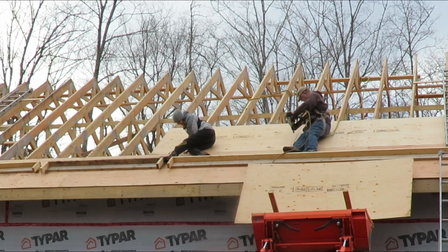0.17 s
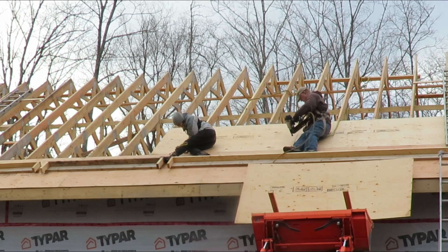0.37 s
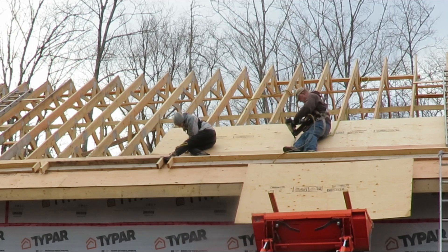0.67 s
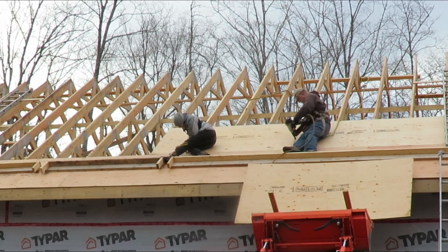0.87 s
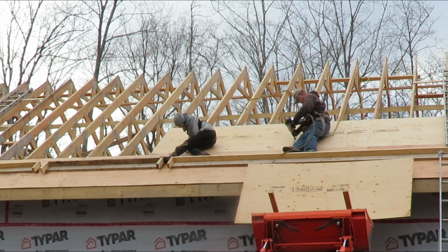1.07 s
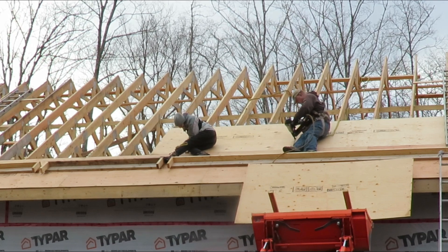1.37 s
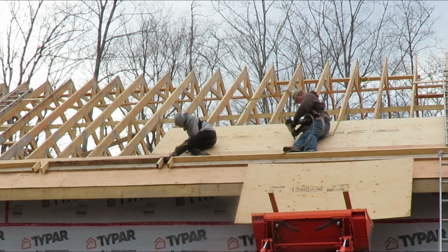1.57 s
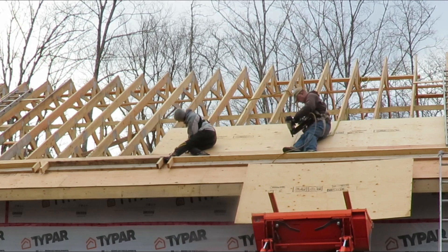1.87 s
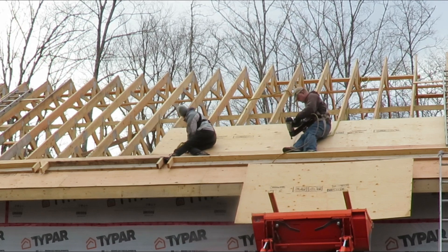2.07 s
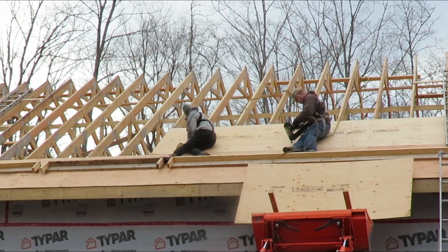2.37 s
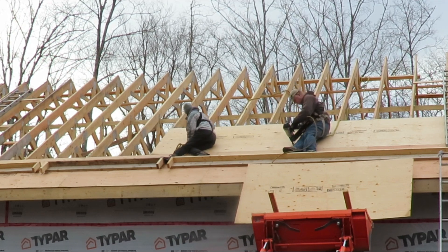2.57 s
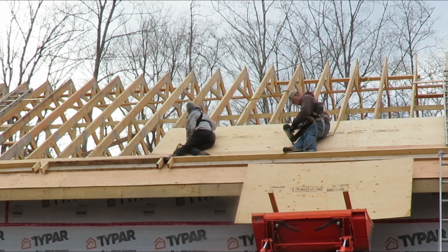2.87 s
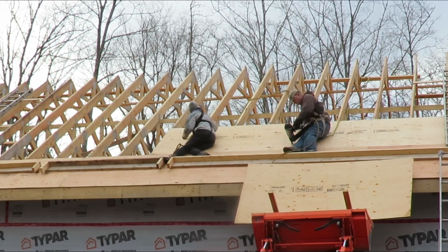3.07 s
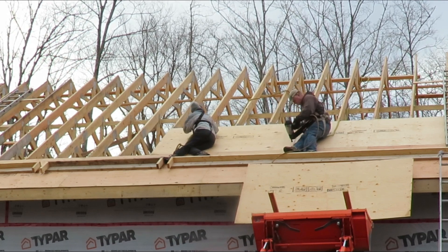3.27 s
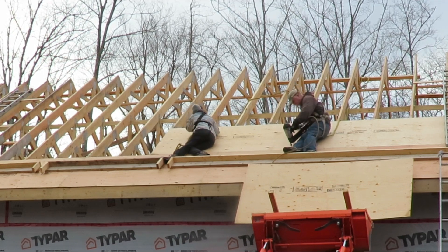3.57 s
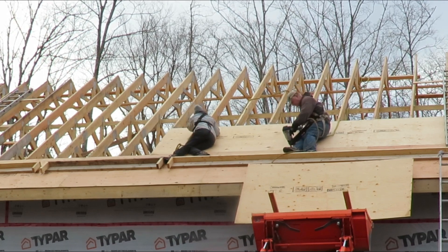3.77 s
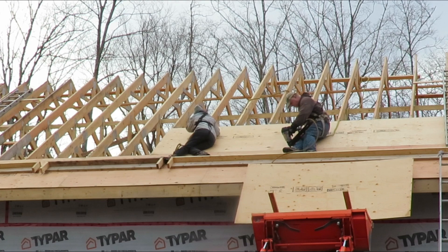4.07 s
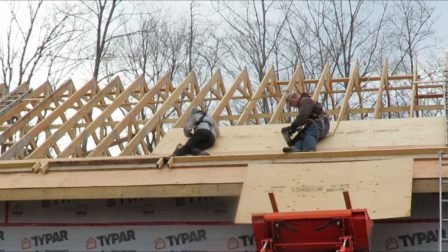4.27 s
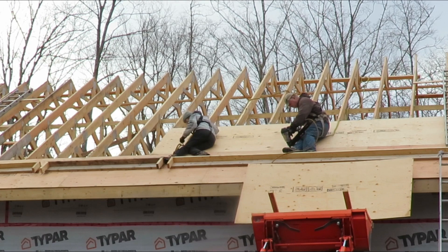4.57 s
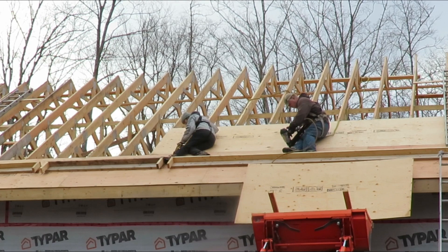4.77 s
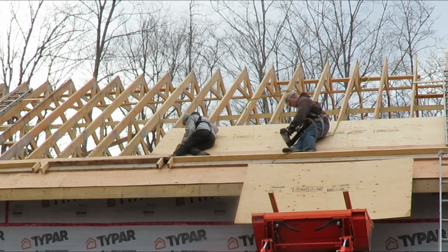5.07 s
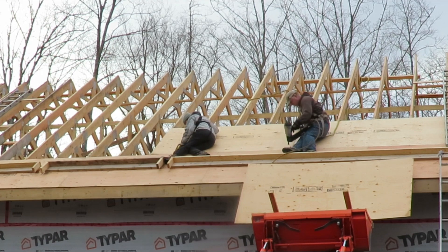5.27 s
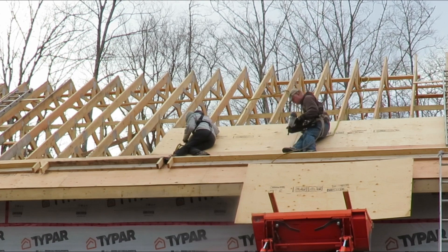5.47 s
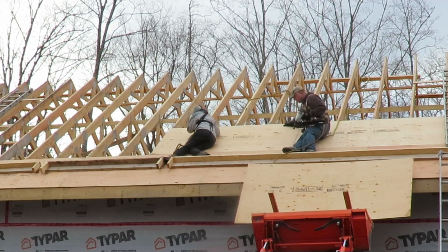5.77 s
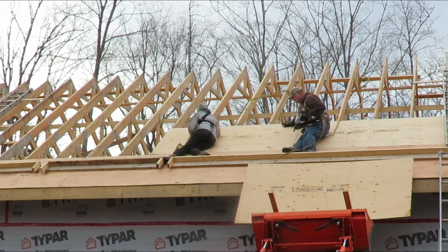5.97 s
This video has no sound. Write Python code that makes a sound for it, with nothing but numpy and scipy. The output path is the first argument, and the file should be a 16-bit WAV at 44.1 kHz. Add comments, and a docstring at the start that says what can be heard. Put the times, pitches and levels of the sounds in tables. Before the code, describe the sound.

Single bangs from an air nailer echo across a quiet building site, separated by small knocks and short drags over wood.

```python
"""Nail gun on a roof

A pneumatic nailer fastens plywood, heard from the ground of an open building site. Each shot is a valve
snap, the nail's thud, the piston's stop, a puff of exhaust and the return clack, echoing off house and
trees. Between shots the gun is pressed onto the sheet and something is dragged over the boards.
A far engine hums. An automatic gain control ducks at each shot and creeps back."""
import sys
import numpy as np
from scipy import signal
from scipy.fft import rfft, irfft, next_fast_len
from scipy.io import wavfile

SR = 44100
rng = np.random.default_rng(int(sys.argv[2]) if len(sys.argv) > 2 else 0)


def wav_out(sig):
    """Save sig, one row per channel (or a flat mono array), as 16-bit PCM at SR to the path in sys.argv[1]."""
    wavfile.write(sys.argv[1], SR, np.round(np.clip(np.atleast_2d(sig).T, -1, 1) * 32767).astype(np.int16))


N = 270333
TIME = np.arange(N) / SR
HIT_TIME = np.arange(SR // 3) / SR   # time within one shot or knock


# trigger pulls: start_s, level_db, stroke_delay_ratio, sheet_pitch_ratio, crack_db, echo_db,
# return_delay_s, return_db
SHOTS = [(-0.030, 3, 0.93, 1.2, 6.5, 5, 0.069, -8), (1.6719, 0.3, 1, 1.006, 0, 7, 0.0702, -4),
         (3.0833, 2.5, 0.97, 1.0, -3, 3, 0.0688, -10.5), (5.1420, 0, 0.95, 1.038, 1, 4, 0.0695, -8)]

def nailing(echoes, diffuse_db=14.5, ringing_db=6, low_cut_hz=160, echo_delay_s=.008):
    """Each shot arrives directly, followed by a smooth echo tail with a few broad resonances in it."""
    out = np.zeros(N)
    low_cut = signal.butter(2, low_cut_hz, "high", fs=SR, output="sos")   # gently rolls off the bass of each shot
    tail = from_db(diffuse_db) * echoes + from_db(ringing_db) * ringing_echoes()
    for start_s, level_db, stretch, pitch, crack_db, echo_db, return_s, return_db in SHOTS:
        shot = exhaust_puff(HIT_TIME) + deck_shudder(HIT_TIME)
        shot += strokes(HIT_TIME, stretch, pitch, crack_db)
        shot += from_db(return_db) * piston_return(HIT_TIME - return_s)
        add(out, from_db(level_db) * signal.sosfilt(low_cut, shot), start_s)
        add(out, from_db(level_db + echo_db) * tail, start_s + echo_delay_s)
    return out


# valve opens, nail enters, then the piston stop strikes three times in quick succession: # delay_s, gun_db,
# plywood_db, crack_db, crack_t60_s
STROKES = [(0.0001, -14, -17.5, -10, 0.033), (0.0078, -19.5, 1.5, -6.5, .012),
           (0.011, -7, -1.5, -3.5, .016), (0.013, 3.5, -15.5, 1.5, 0.065), (0.0160, 3, -13, 7, .036)]

def strokes(t, stretch, sheet_pitch, shot_crack_db):
    """Five quick blows fuse into one bang; each rings gun and sheet and cracks briefly."""
    out = np.zeros(len(t))
    for delay_s, gun_db, plywood_db, crack_db, crack_t60_s in STROKES:
        since = t - delay_s * stretch
        out += from_db(gun_db) * gun_body(since) + from_db(plywood_db) * plywood(since, sheet_pitch)
        out += from_db(shot_crack_db + crack_db) * crack(since, crack_t60_s)
    return out


# modes of the gun body: pitch_hz, level_db, t60_s
GUN_MODES = [(1090, -2.5, .04), (1237, -6, 0.042), (1400, -6, 0.017), (1727, 1.5, 0.026), (1874, -3, 0.05),
             (2091, -4, 0.036), (2355, -7.5, 0.066), (2635, -6.5, 0.054), (3232, -9.5, .025),
             (3660, -9, 0.01), (4500, -10.5, .02), (5730, -6.5, .022)]

def gun_body(t):
    """The struck gun gives a short, bright clank."""
    return ring(GUN_MODES, t)


# modes of the sheet on its rafters: pitch_hz, level_db, t60_s
PLYWOOD_MODES = [(161, -21.5, .06), (228.2, -0.5, 0.023), (316, -1.5, 0.05), (354, -5, 0.058),
                 (524, -6.5, 0.061), (612, -13.5, 0.031), (829, -5, 0.058), (1097, -1.5, 0.017),
                 (1407, -2, .025)]

def plywood(t, pitch_ratio=1):
    """The sheet thuds, its pitch depending on the spot that is hit."""
    return ring(PLYWOOD_MODES, t, pitch_ratio)


# colour of the crack: freq_hz, level_db
CRACK_COLOUR = [(30, -14.5), (120, -11), (300, -5.5), (700, 2.5), (1600, 2.5), (3000, -2), (5500, -5),
                (7200, -13), (11000, -14), (15500, -30.5)]

def crack(t, t60_s):
    """A splintering burst of noise on the front of a blow."""
    return fade(t, t60_s) * noise(CRACK_COLOUR, len(t))


# colour of the exhaust air: freq_hz, level_db
EXHAUST_COLOUR = [(100, -4.5), (300, 7), (900, -1), (2200, 4.5), (4000, -2.5), (6000, 0), (7500, -8.5),
                  (10000, -5), (13000, -11.5), (15500, -28.5)]

def exhaust_puff(t, level_db=-8.5, delay_s=.025, sag_db_per_s=261.5):
    """The port opens, the blast sags as the cylinder empties, then the port shuts."""
    since = t - delay_s
    pressure = from_db(level_db - sag_db_per_s * since)
    port = envelope(since, attack_s=.009, hold_s=.023, release_t60_s=.099)
    return noise(EXHAUST_COLOUR, len(t)) * pressure * port


def piston_return(t, rattle_db=-4, rattle_t60_s=.11):
    """The piston clacks home, ringing the body and rattling the nose."""
    rattle = fade(t, rattle_t60_s) * steel_nose(rng.standard_normal(len(t)))
    return gun_body(t) + from_db(rattle_db) * rattle


# resonances of the nose piece: pitch_hz, width_hz, level_db
NOSE_RESONANCES = [(560, 48, -7), (1010, 610, -10), (1526, 110, 0.5), (1735, 170, 1), (2290, 220, 0),
                   (2840, 570, -10), (3800, 380, -7.5), (5170, 700, -15), (6000, 350, -15),
                   (9000, 3500, -27.5)]

def steel_nose(contact):
    """The nose piece gives contact noise a metallic ring."""
    return resonate(contact, NOSE_RESONANCES)


# colour of the shaking roof deck: freq_hz, level_db
DECK_COLOUR = [(50, -20), (130, -2.5), (300, -3), (700, -2), (1300, -6.5), (3000, -23), (8000, -43.5)]

def deck_shudder(t, level_db=-19, delay_s=.02):
    """The blow spreads through the roof deck, which booms briefly."""
    boom = envelope(t - delay_s, attack_s=.035, hold_s=.035, release_t60_s=.41)
    return from_db(level_db) * noise(DECK_COLOUR, len(t)) * boom


def knock(t60_s, wood_db=-17.5, bright_hz=9000, deck_db=-9, deck_t60_s=.21):
    """A rattling contact rings the nose; wood_db sets how much it thumps the sheet and shakes the deck."""
    t = HIT_TIME
    burst = rng.standard_normal(len(t)) * fade(t, t60_s)
    contact = signal.lfilter(*signal.butter(2, bright_hz, fs=SR), burst)
    deck = from_db(deck_db) * noise(DECK_COLOUR, len(t)) * fade(t, deck_t60_s)
    return steel_nose(contact) + from_db(wood_db) * (plywood(t) / 2 + deck)


# nose pressed onto the sheet: start_s, touch_db, tip_travel_s, seat_db, wood_db
PRESSES = [(1.5438, -22.5, 0.012, -19, -2), (2.9298, -24, 0.0081, -22.5, -4),
           (4.770, -34.5, .027, -27, -9.5)]
# light clicks of gun and nail strip: start_s, level_db, bright_hz
CLICKS = [(0.967, -32, 2278), (1.420, -36.5, 2397), (1.824, -11.5, 14000), (2.670, -27, 9000),
          (2.691, -30.5, 5980), (2.726, -37, 11810), (2.796, -36, 4500), (3.042, -32.5, 6000),
          (3.208, -10.5, 14000)]

def handling():
    """A press is a touch, then a firm knock as the safety tip bottoms out; the gun clicks in the hand."""
    out = np.zeros(N)
    for start_s, touch_db, travel_s, seat_db, wood_db in PRESSES:
        add(out, from_db(touch_db) * knock(t60_s=.022), start_s)
        add(out, from_db(seat_db) * knock(t60_s=.038, wood_db=wood_db), start_s + travel_s)
    for start_s, level_db, bright_hz in CLICKS:
        add(out, from_db(level_db) * knock(t60_s=.044, bright_hz=bright_hz), start_s)
    return out


# drags, each pressing harder until it stops: start_s, length_s, final_db, swell_db_per_s
DRAGS = [(4.128, .345, -26.5, 49), (5.468, 0.239, -27, 21)]
# scuffs where the load catches: start_s, level_db
CATCHES = [(4.160, -32.5), (4.282, -28), (4.334, -19.5), (4.379, -18), (4.426, -29.5), (5.68, -18)]
# resonances of the rubbed boards: pitch_hz, width_hz, level_db
BOARD_RESONANCES = [(304, 200, -11.5), (540, 210, -1), (910, 290, 0), (1400, 260, -2.5), (1840, 370, -4.5),
                    (2300, 460, -7.5), (2570, 270, -5), (3040, 215, -4), (3600, 280, -8.5),
                    (5600, 2600, -25.5)]

def dragging(slips_per_s=800, judder_db=2, scuff_t60_s=.029, dull_hz=6500):
    """Dense little slips excite the boards; the load judders and now and then catches with a scuff."""
    force = np.zeros(N)
    for start_s, length_s, final_db, swell_db_per_s in DRAGS:
        since = TIME - start_s
        swell = from_db(final_db + swell_db_per_s * np.minimum(since - length_s, 0))
        force += swell * envelope(since, attack_s=.022, hold_s=length_s, release_t60_s=.15)
    force *= from_db(judder_db * drift(per_s=70))
    slips = rms_one(rng.choice([-1, 1], N) * (rng.random(N) < slips_per_s / SR))
    catches = sum(from_db(db) * fade(TIME - start_s, scuff_t60_s) for start_s, db in CATCHES)
    scuffs = catches * rng.standard_normal(N)
    boards = resonate(slips * force + scuffs, BOARD_RESONANCES)
    return signal.sosfilt(signal.butter(2, dull_hz, fs=SR, output="sos"), boards)


# colour of brushing cloth: freq_hz, level_db
CLOTH_COLOUR = [(300, -12.5), (1400, -5), (3200, -4.5), (4200, -10.5), (5400, 1), (7000, -15), (15000, -26)]

def rustle(start_s=5.97, level_db=-57, flutter_db=2):
    """Cloth brushes softly and unevenly as a worker shifts."""
    flutter = from_db(flutter_db * drift(per_s=53))
    brush = envelope(TIME - start_s, attack_s=.074, hold_s=.16, release_t60_s=.2)
    return from_db(level_db) * noise(CLOTH_COLOUR, N) * flutter * brush


# reverb of house, trusses and trees: freq_hz, level_db, t60_s
YARD_REVERB = [(50, -19.5, 0.76), (99, -10.5, 1.1), (162, -1.5, 0.87), (280, 4, 0.63), (504.3, -3.5, 0.92),
               (1080, -4, 1.03), (2097, -3, 1.1), (3500, -8, 0.96), (6110, -9, .62), (8200, -13, 0.46),
               (11000, -20, 0.46), (14970, -35.5, .33)]

def yard_echoes(build_s=.011, near_db=-1, near_t60_ratio=.2, bands=20):
    """Echoes of one impulse, unit energy: near ones die fast, far ones linger, the treble least."""
    t = np.arange(SR) / SR
    white, hz = rfft(rng.standard_normal(SR)), np.fft.rfftfreq(SR, 1 / SR)
    centres_hz = np.geomspace(50, 15000, bands)
    echoes = 0
    for centre_hz, weights in zip(centres_hz, np.eye(bands)):
        band = irfft(white * np.interp(hz, centres_hz, weights), SR)
        t60_s = at_hz(YARD_REVERB, centre_hz, column=2)
        decay = fade(t, t60_s) + from_db(near_db) * fade(t, near_t60_ratio * t60_s)
        echoes += band * from_db(at_hz(YARD_REVERB, centre_hz)) * decay
    build_up = 1 - np.exp(-(t / build_s) ** 2)
    return rms_one(echoes * build_up) / np.sqrt(SR)


# resonances in the echoes: pitch_hz, width_hz, level_db
ECHO_RESONANCES = [(238, 90, -1.5), (366, 60, -2), (730, 160, -3), (1217, 110, 0), (1757, 200, 1),
                   (2280, 200, 0), (2760, 150, -1.5), (3400, 190, -1.5), (4670, 200, -5), (5700, 540, -2)]

def ringing_echoes():
    """A second tail from the yard, coloured by broad resonances."""
    return resonate(yard_echoes(), ECHO_RESONANCES)


# tones of the far engine: pitch_hz, level_db
ENGINE_TONES = [(59.2, -67.5), (145.3, -60), (296.1, -54), (532.9, -66.5), (796.7, -57.5), (1292, -68.5)]

def far_engine(width_hz=3):
    """A wavering hum made of very narrow bands of noise."""
    hum = np.zeros(N)
    for pitch_hz, level_db in ENGINE_TONES:
        peak = [(pitch_hz, width_hz, 0)]
        tone = resonate(resonate(rng.standard_normal(N), peak), peak)
        hum += from_db(level_db) * rms_one(tone)
    return hum


# colour of open air and microphone hiss: freq_hz, level_db
AIR_COLOUR = [(30, -16.5), (60, -14), (110, -15), (200, -13.5), (330, -8), (600, -12.5), (830, -10.5),
              (1200, -15.5), (1800, -20.5), (3200, -29.5), (5500, -33.5), (8000, -37.5), (15500, -39)]

def open_air(level_db=-45.5, low_cut_hz=42):
    """A steady bed of outdoor noise with the deepest rumble rolled off."""
    low_cut = signal.butter(4, low_cut_hz, "high", fs=SR, output="sos")
    return from_db(level_db) * signal.sosfilt(low_cut, noise(AIR_COLOUR, N))


def from_db(db):
    """Decibels to gain."""
    return 10 ** (np.asarray(db) / 20)


def rms_one(x):
    """Scale to unit power."""
    return x / np.sqrt(np.mean(x ** 2) + 1e-20)


def add(out, sound, start_s):
    """Mix a sound into out, trimming what falls outside it."""
    at = int(round(start_s * SR))
    sound, at = sound[max(-at, 0):], max(at, 0)
    out[at:at + len(sound)] += sound[:len(out) - at]


def at_hz(table, hz, column=1):
    """Read a column of a table on a log-frequency axis."""
    table = np.array(table)
    return np.interp(np.log(np.maximum(hz, 1)), np.log(table[:, 0]), table[:, column])


def noise(colour, size):
    """Noise of a given colour, rms 1."""
    padded = next_fast_len(size)
    gains = from_db(at_hz(colour, np.fft.rfftfreq(padded, 1 / SR)))
    return rms_one(irfft(rfft(rng.standard_normal(padded)) * gains, padded)[:size])


def drift(per_s, points=1000):
    """Random wavering, spread about 1."""
    return np.interp(TIME * per_s, np.arange(points), rng.standard_normal(points))


def fade(t, t60_s):
    """Exponential decay that starts at t = 0."""
    return (t >= 0) * np.exp(-np.log(1000) * np.maximum(t, 0) / t60_s)


def envelope(t, attack_s, hold_s, release_t60_s):
    """Rises from t = 0, holds until hold_s, then dies away."""
    return np.clip(t / attack_s, 0, 1) * fade(np.maximum(t - hold_s, 0), release_t60_s)


def ring(modes, t, pitch_ratio=1):
    """Damped sines of a body struck at t = 0; neighbouring modes swing opposite ways."""
    return sum((-1) ** k * from_db(db) * fade(t, t60_s) * np.sin(2 * np.pi * hz * pitch_ratio * t)
               for k, (hz, db, t60_s) in enumerate(modes))


def resonate(x, peaks):
    """Parallel resonances, scaled so that white noise keeps about its power."""
    out, power = 0, 0
    for k, (hz, width_hz, db) in enumerate(peaks):
        radius = np.exp(-np.pi * width_hz / SR)
        poles = [1, -2 * radius * np.cos(2 * np.pi * hz / SR), radius ** 2]
        scale = (1 - radius ** 2) / 2
        out += (-1) ** k * from_db(db) * scale * signal.lfilter([1, 0, -1], poles, x + 1e-18)
        power += from_db(db) ** 2 * scale
    return out / np.sqrt(power)


def scene(knock_echo_db=-18, drag_echo_db=-13):
    """Work on the roof and its echoes over the background of the site, in mono."""
    echoes, knocks, drags = yard_echoes(), handling(), dragging()
    reverb_send = from_db(knock_echo_db) * knocks + from_db(drag_echo_db) * drags
    reverb = signal.fftconvolve(reverb_send, echoes)[:N]
    return (nailing(echoes) + knocks + drags + reverb + rustle() + far_engine() + open_air())[None]


def gain_control(x, threshold_db=-8.5, release_db_per_s=9.5, start_duck_db=14,
                 sense_s=.0038, attack_s=.00088):
    """The gain starts ducked and climbs at a steady rate; loud sound pulls it down at once."""
    sense, attack = np.exp(-1 / (sense_s * SR)), np.exp(-1 / (attack_s * SR))
    power = signal.lfilter([1 - sense], [1, -sense], x ** 2)
    over_db = np.maximum(10 * np.log10(power + 1e-12) - threshold_db, 0)
    climb_db = release_db_per_s * TIME
    duck_db = np.maximum(np.maximum.accumulate(over_db + climb_db, axis=-1), start_duck_db) - climb_db
    smooth_db = start_duck_db + signal.lfilter([1 - attack], [1, -attack], duck_db - start_duck_db)
    return x * from_db(-smooth_db)


def record(dry, soften_hz=13000, cutoff_hz=15750):
    """Gain control, soft clipping of the peaks that slip through, a softened top and a steep high cut."""
    ducked = gain_control(dry)
    clipped = .97 * ducked / (1 + ducked ** 6) ** (1 / 6)
    soft = signal.sosfilt(signal.butter(1, soften_hz, fs=SR, output="sos"), clipped)
    return signal.sosfilt(signal.ellip(10, .1, 70, cutoff_hz, fs=SR, output="sos"), soft)


dry = scene()
out = record(dry)
wav_out(out)
```